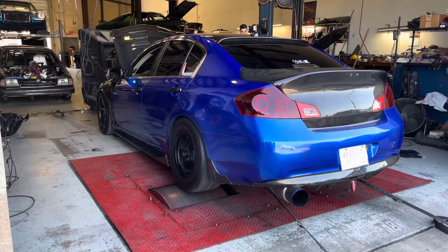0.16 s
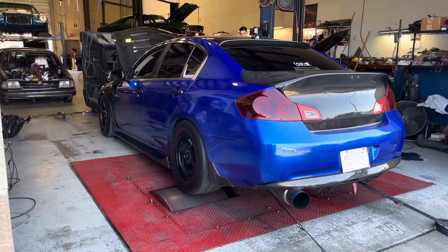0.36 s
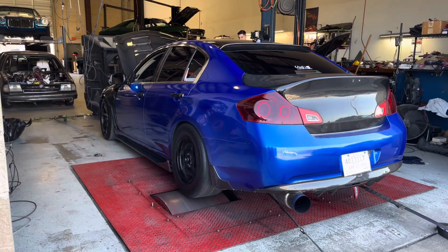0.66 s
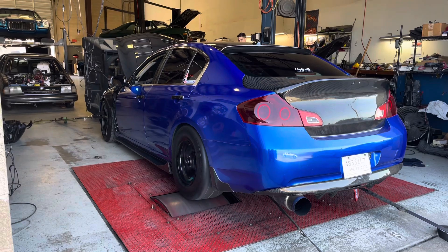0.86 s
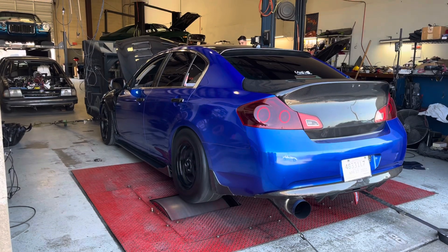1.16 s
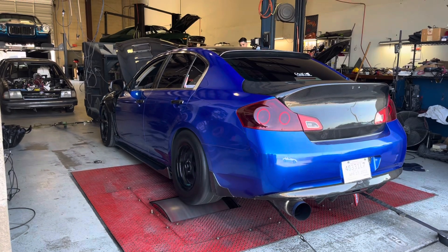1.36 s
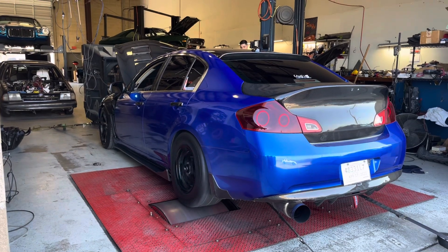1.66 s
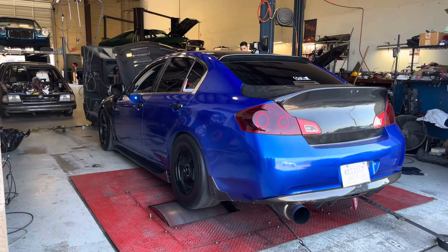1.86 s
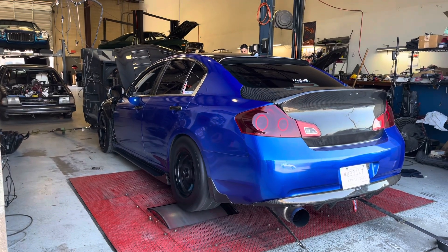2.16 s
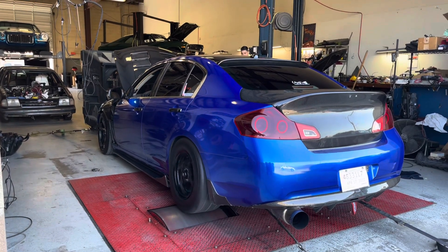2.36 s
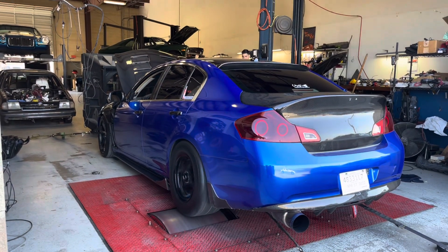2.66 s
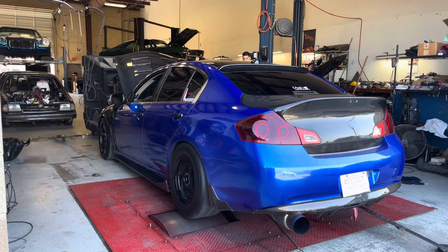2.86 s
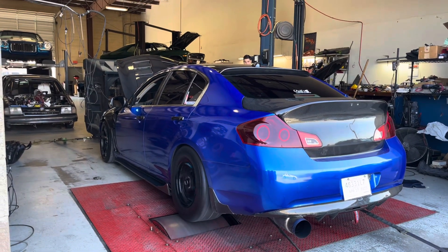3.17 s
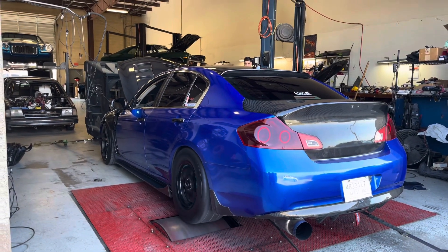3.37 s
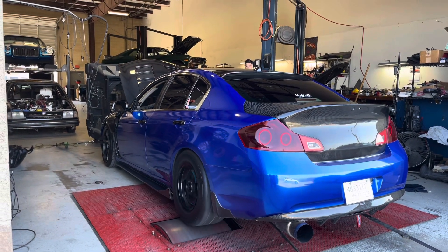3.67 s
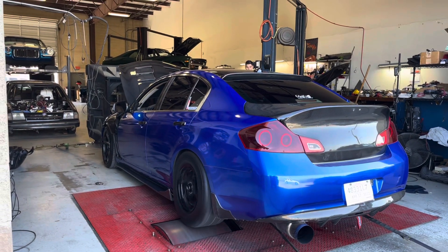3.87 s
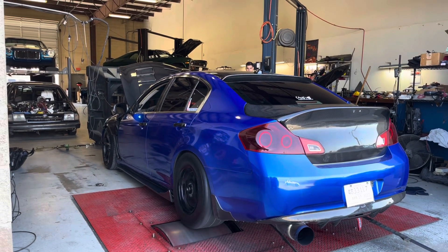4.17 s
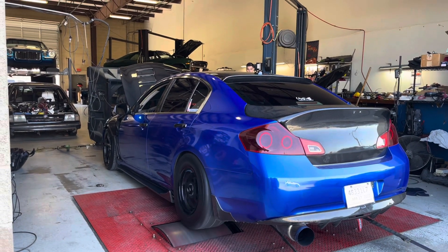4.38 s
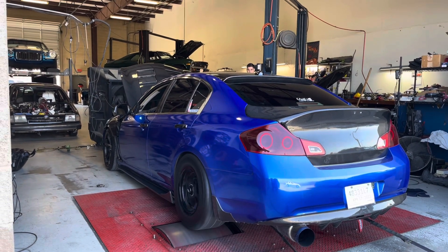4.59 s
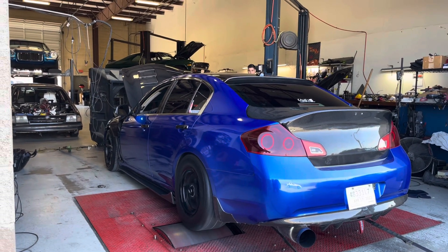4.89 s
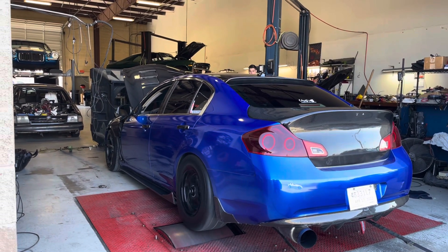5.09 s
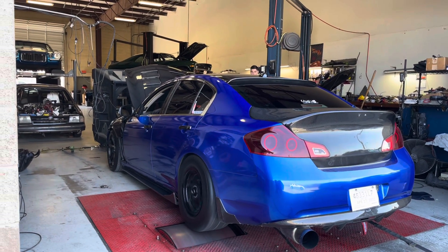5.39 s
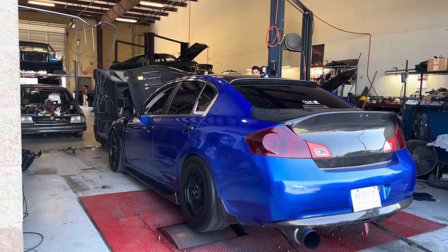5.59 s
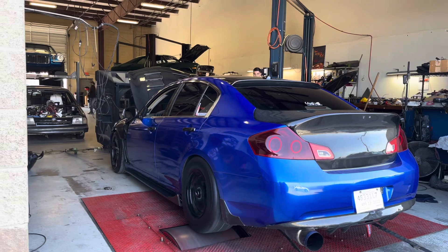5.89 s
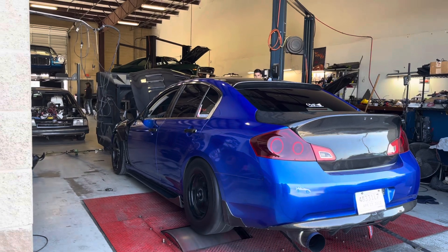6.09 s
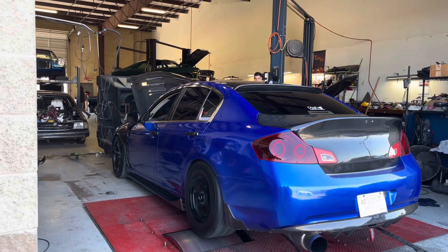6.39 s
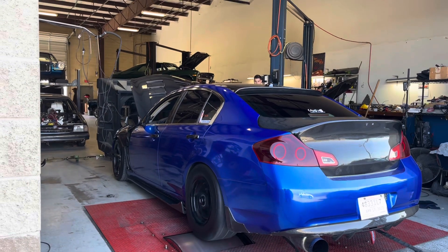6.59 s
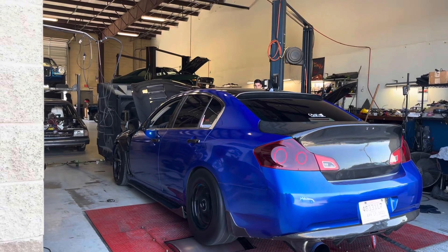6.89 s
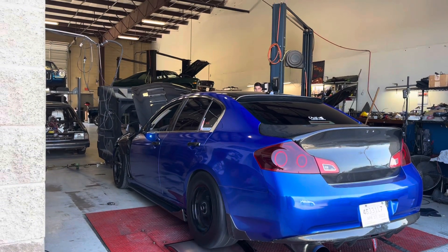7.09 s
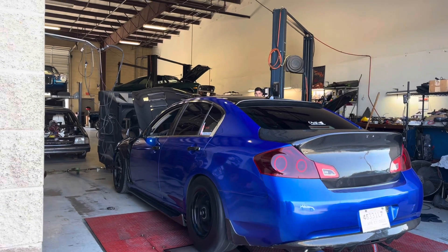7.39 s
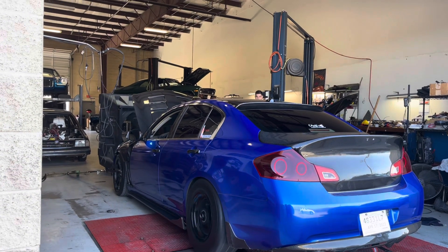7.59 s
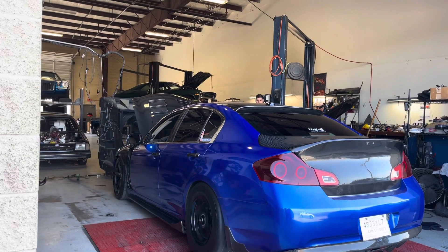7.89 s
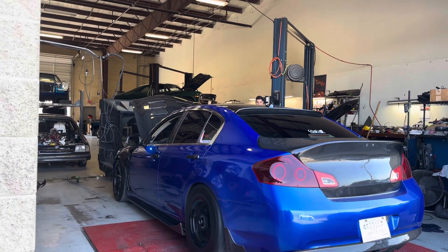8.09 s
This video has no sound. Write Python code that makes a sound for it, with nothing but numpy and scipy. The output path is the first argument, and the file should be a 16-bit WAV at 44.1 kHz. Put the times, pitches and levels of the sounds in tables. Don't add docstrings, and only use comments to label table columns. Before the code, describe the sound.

Close, loud exhaust drone with hissing rasp rises smoothly for eight seconds, with crackly onset and a thump and flare near two seconds.

```python
import sys
import numpy as np
from scipy import signal
from scipy.fft import rfft, irfft, next_fast_len
from scipy.io import wavfile

SR = 44100
rng = np.random.default_rng(int(sys.argv[2]) if len(sys.argv) > 2 else 0)


def unload_wav(signal):
    wavfile.write(
        sys.argv[1],
        SR,
        np.round(np.clip(np.atleast_2d(signal).T, -1, 1) * 32767).astype(np.int16),
    )


def makeup_ratio(level_db):
    decades = np.asarray(level_db, float) / 20
    return 10 ** decades


N = 363825
TIME_S = np.arange(N) / SR
CYLINDERS = 6
SHIFT_S, SHIFT_LENGTH_S = 2.2, 0.088


def rms_one(x):
    return x / np.sqrt(np.mean(x ** 2) + 1e-20)


def in_time(rows):
    return np.interp(TIME_S, *np.transpose(rows))


def on_grid(points, size, axis=1):
    hz = np.maximum(np.fft.rfftfreq(size, 1 / SR), 1)
    points = np.array(points)
    return np.interp(np.log(hz), np.log(points[:, 0]), points[:, axis])


def drift(rate_hz, count=1):
    knots = rng.standard_normal((count, 400))
    place = TIME_S * np.clip(rate_hz, .1, 45)
    k = place.astype(int)
    mix = np.sin(np.pi / 2 * (place - k)) ** 2
    return knots[:, k] * (1 - mix) + knots[:, k + 1] * mix


def highpass(x, hz):
    return signal.sosfilt(signal.butter(4, hz, "high", fs=SR, output="sos"), x)


def causal(spectrum_db):
    cep = irfft(spectrum_db * np.log(10) / 20)
    cep[1:len(cep) // 2] *= 2
    cep[len(cep) // 2 + 1:] = 0
    return np.exp(rfft(cep))


def hall(size, wet_db, t60_s=.35):
    t = np.arange(SR) / SR
    tail = rng.standard_normal((2, SR)) * makeup_ratio(-60 * t / t60_s) * (t > .004)
    tail /= np.sqrt(np.sum(tail ** 2, axis=1, keepdims=True))
    return 1 + makeup_ratio(wet_db) * rfft(tail, size)


# (pitch [Hz], width [Hz], left [dB], right [dB])
CANCELLING_ECHOES = [(186, 26, -1, -9.5), (285.5, 7.8, -4.5, -26), (312, 21.7, -12, 4),
                     (394.3, 76.5, -67, -19.5), (467.3, 10, -7.5, -6), (513, 14, -17.5, -29),
                     (564.8, 14.4, -42, -31), (608.4, 36.6, -18.5, -39), (683, 84, -19, -15.5),
                     (737.6, 8.3, -61, -35.0), (774, 8.2, -17.5, -10.5), (837, 3.1, -46, -36),
                     (882, 5.7, -0.0, -4), (926, 180, -15.5, -4)]
# (pitch [Hz], width [Hz],
# left [dB], right [dB])
MORE_ECHOES = [(209, 5.8, 3, 2.5), (226.6, 7, -1.5, -0.5), (240, 6.1, 2.5, 3), (333, 8.7, 2.5, 3.5),
               (405, 6, -1, -14), (548, 4.5, -11.5, -7), (625, 3.6, -14, -25), (651, 5, -10, -1),
               (755, 6.6, 2.5, 5.5), (967, 11, -17, -10), (1166, 17, -3, 3), (1280, 17, -2, -1),
               (1386, 19, 1.5, 1), (1462, 12, 5, -13)]


def echo_db(hz):
    centre, width, *depth_db = np.transpose(CANCELLING_ECHOES + MORE_ECHOES)[:, :, None]
    off = ((hz - centre) / width) ** 2
    return np.array([10 * np.log10(np.prod((off + makeup_ratio(2 * d)) / (off + 1), axis=0)) for d in depth_db])


def echoes_on_grid(size):
    hz = np.fft.rfftfreq(size, 1 / SR)
    coarse_hz = np.arange(0, 4000.)
    return np.array([np.interp(hz, coarse_hz, side_db, right=0) for side_db in echo_db(coarse_hz)])


# (frequency [Hz], left-right likeness [0..1], right leads [rad])
PORTS = [(100, .95, 0), (700, .6, .1), (1250, .9, .1), (1750, .5, .7), (2250, .88, 0), (3300, .55, -1.9),
         (4500, .15, -3.6), (6500, .2, -6.1), (8200, .6, -6.7), (9000, .8, -5.6), (9850, .995, -3.35),
         (10450, .995, -2.95), (11000, .97, -1.9), (12000, .97, 0), (13000, .75, .3)]
# (frequency [Hz], left minus right [dB])
TILT = [(60, -24), (110, -7), (200, 5), (360, 9), (640, 8), (1170, 1), (2110, -6), (3830, -1), (6930, 1.5),
        (12600, 0)]


def ports(source, other, spectrum):
    size = next_fast_len(N)
    alike = np.clip(on_grid(PORTS, size), 0, 1)
    lead = on_grid(PORTS, size, axis=2)
    a, b = makeup_ratio(on_grid(spectrum, size)) * rfft([source, other], size)
    same = np.sqrt(1 + alike) * a
    apart = np.sqrt(1 - alike) * b
    tilt = makeup_ratio(on_grid(TILT, size) / 2)
    left = (same + apart) * tilt
    right = (same - apart) / tilt * np.exp(1j * lead)
    return rms_one(irfft([left, right], size)[:, :N])


# (time [s], peak [dB], length [s])
GUSTS = [
    (1.66, -26, 0.021),
    (1.88, -38, .025),
    (2.035, -40, 0.056),
    (2.19, -9, 0.014),
    (2.496, -40, 0.017),
    (4.155, -19, 0.018),
    (4.932, -31, .02),
    (5.088, -41, .02),
    (5.657, -41, 0.024),
]


def buffeting():
    blast = makeup_ratio(-27 - 90 * np.abs(TIME_S - 0.24))
    calm = makeup_ratio(-77 + 14 * drift(6.2)[0])
    low = signal.butter(2, [14, 55], "band", fs=SR, output="sos")
    shared, own = signal.sosfilt(low, rng.standard_normal((2, N + SR)))[:, SR:]
    pressure = rms_one(shared + .25 * own * [[1], [-1]]) * (blast + calm) * makeup_ratio(-6.0)
    for s, peak_db, length_s in GUSTS:
        u = np.clip((TIME_S - s) / length_s, 0, 30)
        thump = u * np.exp(-2.2 * u) * np.sin(2 * np.pi * 2.0 * np.sqrt(u))
        pressure = pressure + makeup_ratio(peak_db + 8.5) * thump * makeup_ratio([[-.7], [.7]])
    return pressure


def puffs(cycle, place, size_db, sharp):
    now = CYLINDERS * cycle
    k = np.clip(np.searchsorted(place, now) - 1, 0, None)
    return np.exp(-sharp * np.abs(now - place[k])) * makeup_ratio(size_db[k])


# (frequency [Hz], density [dB per Hz])
ROAR = [(25, -62), (70, -3), (200, 0), (600, -6.5), (1200, -4), (1640, -9), (2200, -6.5), (2900, -31),
        (4500, -49)]


def gas_roar(cycle, place, blow_db, white):
    swell = 0.73 + puffs(cycle, place, blow_db, sharp=0.35)
    return ports(*(white * swell), ROAR)


# (frequency [Hz], density [dB per Hz])
HISS = [(2500, -3.5), (3500, -6), (5500, -10.5), (7500, -9.5), (9300, -6.5), (10500, 2.5), (11600, -4.5),
        (12500, -16), (13200, -18), (15000, -33)]
# (time [s], height [ratio])
CRACK = [(0, 1.2), (2.0, 2.2), (4.2, 1.65), (6.0, 0.57), (8.25, 0.47)]
# (time [s], extra level [dB])
SNAPS = [
    (.09, 10),
    (.17, 7),
    (.33, 11.5),
    (.48, 7),
    (.72, 6),
    (.78, 11),
    (1.08, 12),
    (1.85, 9),
    (2.15, 6.5),
]


def jet_hiss(cycle, place, blow_db, chance, white):
    crack_db = 1.7 * blow_db + 2.9 * chance
    for s, extra_db in SNAPS:
        nearest = np.argmin(np.abs(place - CYLINDERS * cycle[int(s * SR)]))
        crack_db[nearest] += extra_db
    crack = in_time(CRACK) * puffs(cycle, place, crack_db, sharp=4.3)
    jet = makeup_ratio(0.91 * drift(17)[0])
    bright = 0.91 * np.gradient(white[0] * crack)
    return ports(white[0] * jet + bright, white[1] * (jet + 0.22 * crack), HISS)


# (order [per cycle], start [dB], slope [dB/s], after shift [dB], slope [dB/s])
ORDER_LAWS = [(2.0, -44, -7, -46.5, 1.25), (3.0, -40, -3, -35, 0.5), (4.0, -40, 0.7, -38, -1.0),
              (5.0, -27.5, -3.5, -32, -0.82), (6.0, -11.5, 0.34, -13.5, -1.86),
              (7.0, -29, -2.5, -37.5, -0.5), (8.0, -39.5, -7, -38, -1.16), (9.0, -32.5, -5.5, -45, 2.1),
              (10.0, -37, -5, -47.5, 0.4), (11.0, -33.5, -5, -39, 1), (12.0, -26.5, -1, -26, 1.7),
              (13.0, -38.5, -3.5, -32.5, 0.3), (15.0, -38.5, -2.5, -37.5, 1.9),
              (18.0, -23.5, 1.3, -25.5, 1.5), (21.0, -32.5, -3.8, -40.5, 3.5),
              (24.0, -19, -2.2, -25.5, 3.14)]
# (frequency [Hz], level [dB], left minus right [dB])
PATH = [(54.0, 2.5, -2), (128.8, -4.5, 1), (152.4, 8.5, -1.8), (199.2, -1, -5.5), (334.6, 11.5, 7.5),
        (740, 2.5, -2), (1250, -13, 6), (1460, -24, -6)]


def tones(cycle, firing_hz, flow_db):
    step = slice(0, N, 64)
    t = TIME_S[step]
    late = np.clip((t - SHIFT_S) / SHIFT_LENGTH_S + .5, 0, 1)
    wander = drift(1.547, count=len(ORDER_LAWS))
    path_hz, path_db, side_db = np.transpose(PATH)
    out = np.zeros((2, N))
    for i, (order, early_db, early_slope, late_db, late_slope) in enumerate(ORDER_LAWS):
        order = round(order)
        hz = firing_hz[step] * order / CYLINDERS
        before_db = early_db + early_slope * t
        after_db = late_db + late_slope * (t - SHIFT_S)
        level_db = (1 - late) * before_db + late * after_db
        level_db = level_db + .3 * flow_db[step] + echo_db(hz)
        turn = 0.1 + (.55 if order > 7 else .08) * wander[i]
        lag = 3.013 * (order / CYLINDERS - 1) + 1.203 * ((order + 3) % 6 - 3) ** 2
        for ch, sign in enumerate((1, -1)):
            heard_db = level_db[ch] + np.interp(np.log(hz), np.log(path_hz), path_db + sign * side_db / 2)
            gain = np.interp(TIME_S, t, makeup_ratio(heard_db))
            out[ch] += gain * np.sqrt(2) * np.cos(2 * np.pi * order * cycle + sign * turn - lag)
    return out


STAGES_S = (0, 2.1, 2.3, 5.2, 8.25)
BLOWS = [(-1.6, 2.9, 1, 0.24, 3), (0.38, 1.7, 2, 2.1, 1), (2.8, 1.6, 1, 1.2, -3.5), (3.4, 2.2, 0, -0.75, 0),
         (3.6, 0.072, -7.5, 3.5, -1.5), (5.3, 1.5, 0.5, 0.37, 2)]
UNEVEN = [(-0.017, 0.003, 0.054, 0.061, 0.066), (0.043, 0.025, 0.013, 0.017, 0.004),
          (0.008, 0.009, 0.001, 0.007, 0.019), (0.005, 0.001, -0.008, -0.012, -0.029),
          (-0.019, -0.022, -0.018, -0.025, -0.006), (-0.02, -0.015, -0.042, -0.048, -0.054)]
# (time [s], lag [firing intervals])
LAG = [(0, 0.22), (1.3, -0.044), (2.1, -0.049), (2.35, 0.26), (4.2, -0.075), (6.0, -0.17), (8.25, -0.63)]
BURBLE_DB = (-5, 0.5, 5, 4.5, 0.5, -9.5)


def firings(cycle):
    k = np.arange(int(CYLINDERS * cycle[-1]) + 2)
    s = np.interp(k / CYLINDERS, cycle, TIME_S)

    def by_cylinder(rows):
        return np.choose(k % CYLINDERS, [np.interp(s, STAGES_S, row) for row in rows])

    chance = rng.standard_normal((2400, 3))[k]
    place = k + np.interp(s, *np.transpose(LAG)) + by_cylinder(UNEVEN) + 0.0021 * chance[:, 0]
    burble_db = np.take(BURBLE_DB, k % CYLINDERS) * np.exp(-s / 0.72)
    blow_db = by_cylinder(BLOWS) + burble_db + 0.28 * chance[:, 1]
    return place, blow_db, chance[:, 2]


# (frequency [Hz], level [dB])
PIPE = [(30, -62), (90, 3), (300, 16), (560, 8), (780, 6.5), (950, 0.5), (1220, 6), (1420, -8), (1640, -22),
        (1900, -7.5), (2300, -8), (2750, -18.5), (3400, -21.5), (4500, -32)]
# (frequency [Hz], change [dB])
WARMING = [(800, 3), (1100, -1), (1400, 6.5), (1700, 2), (2300, 0), (2850, 1.5), (3400, 7.5)]


def pulses(cycle, place, blow_db, count=256):
    steps = next_fast_len(count * (len(place) + 6))
    at = np.clip(place * count, 0, None)
    k, part = at.astype(int), at % 1
    train = np.bincount(k, makeup_ratio(blow_db) * (1 - part), steps)
    train[1:] += np.bincount(k, makeup_ratio(blow_db) * part, steps)[:-1]

    order = np.fft.rfftfreq(steps, 1 / (CYLINDERS * count))
    notched = [0, 1] + [round(law[0]) for law in ORDER_LAWS]
    keep = np.prod([1 - np.exp(-((order - n) / .3) ** 4) for n in notched], axis=0)
    keep *= np.exp(-(order / 100) ** 2)
    by_angle = irfft(rfft(train) * keep, steps)
    blown = np.interp(CYLINDERS * count * cycle, np.arange(steps), by_angle)

    size = 2 * next_fast_len(N // 2 + SR // 2)
    tilt = makeup_ratio(on_grid(TILT, size) / 2 * [[1], [-1]])
    lead = np.exp(1j * on_grid(PORTS, size, axis=2) * [[0], [1]])
    heat = np.arange(N) / N
    pipe_db, change_db = on_grid(PIPE, size), on_grid(WARMING, size)
    cold = rfft(blown * (1 - heat), size) * causal(pipe_db - change_db)
    warm = rfft(blown * heat, size) * causal(pipe_db + change_db)
    echoes = np.array([causal(side_db) for side_db in echoes_on_grid(size)])
    heard = (cold + warm) * echoes * tilt * lead * hall(size, wet_db=-7.0)
    return rms_one(irfft(heard, size)[:, :N])


# (time [s], firing rate [Hz])
SPEED = [(0.0, 147.5), (0.45, 156.3), (0.75, 162.4), (1.35, 172.1), (1.95, 181.5), (2.05, 183.5),
         (2.25, 192.7), (2.35, 195.1), (2.75, 205.6), (3.1, 215.5), (3.8, 234.0), (4.5, 253.2),
         (5.2, 272.1), (5.55, 282.0), (5.9, 290.5), (6.6, 309.1), (7.3, 326.9), (8.25, 350.6)]
# (time [s], level [dB])
FLOW = [(0, -5), (.45, 0.5), (1.0, 0), (2.1, 0), (2.25, 3.5), (2.8, 0.5), (3.4, 1), (4.1, 2.5), (4.7, 0),
        (5.2, -0.5), (5.9, 0.5), (6.6, 0), (7.3, 0), (8.25, -1.5)]


def scene():
    firing_hz, flow_db = in_time(SPEED), in_time(FLOW)
    cycle = np.cumsum(firing_hz) / SR / CYLINDERS
    place, blow_db, chance = firings(cycle)

    rasp_db = -20 + flow_db
    flare_db = 3 * (TIME_S > SHIFT_S - .04) * np.exp(-np.abs(TIME_S - SHIFT_S) / 0.1)
    hiss_db = -33 + .8 * flow_db + flare_db

    buffet = buffeting()
    white = rng.standard_normal((4, N))
    roar = makeup_ratio(rasp_db - 15) * gas_roar(cycle, place, blow_db, white[:2])
    hiss = makeup_ratio(hiss_db) * jet_hiss(cycle, place, blow_db, chance, white[2:])
    lines = tones(cycle, firing_hz, flow_db)
    rasp = makeup_ratio(rasp_db - 1.91) * pulses(cycle, place, blow_db)
    exhaust = roar + hiss + lines + rasp

    cold, warm = highpass(exhaust, 51), highpass(exhaust, 96)
    return cold + (warm - cold) * TIME_S / TIME_S[-1] + buffet


def low_pass(x):
    return signal.sosfilt(signal.butter(12, 13150, fs=SR, output="sos"), x)


def record(dry):
    rounded = dry / (1 + (dry / .93) ** 6) ** (1 / 6)
    return low_pass(rounded)


dry = scene()
out = record(dry)
unload_wav(out)
```